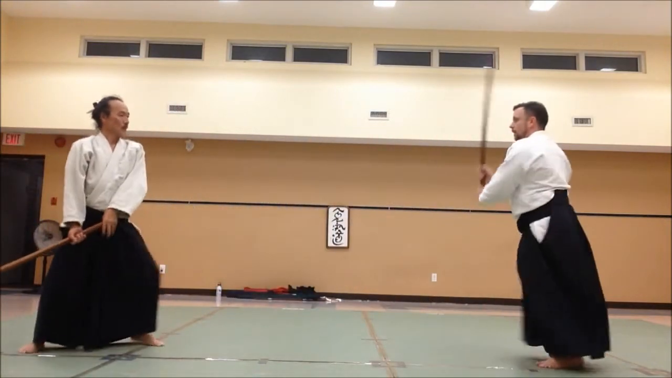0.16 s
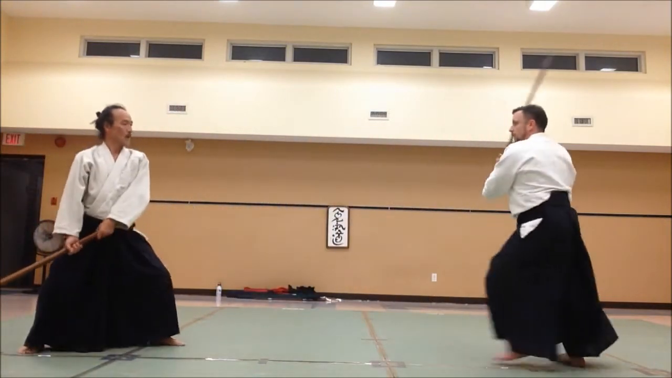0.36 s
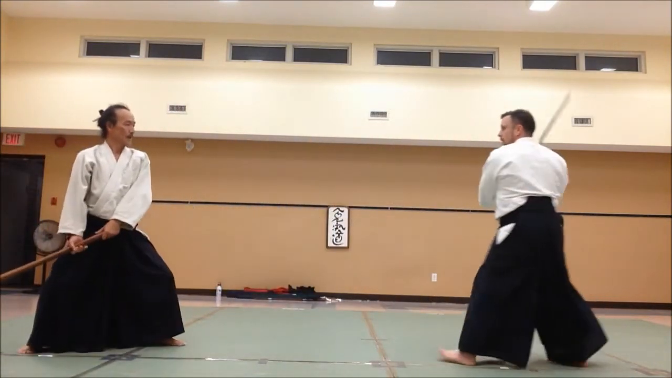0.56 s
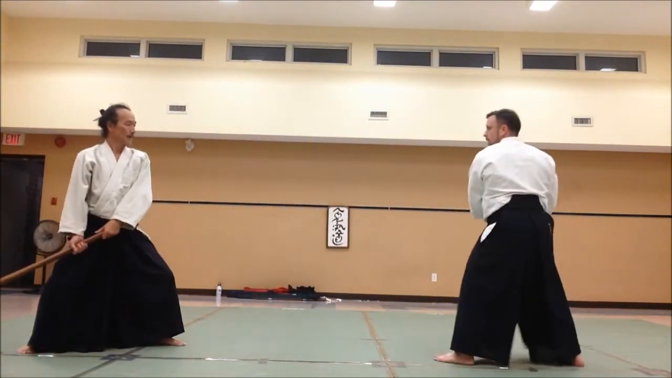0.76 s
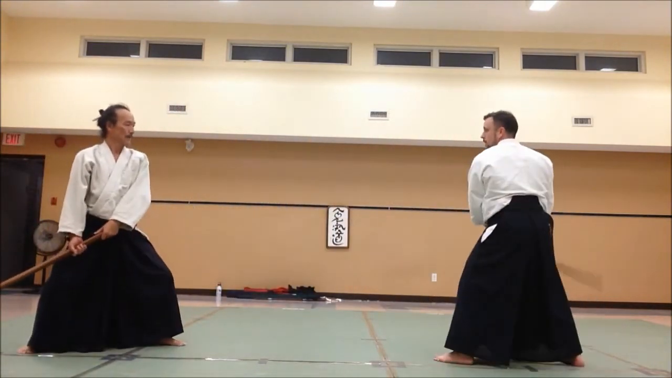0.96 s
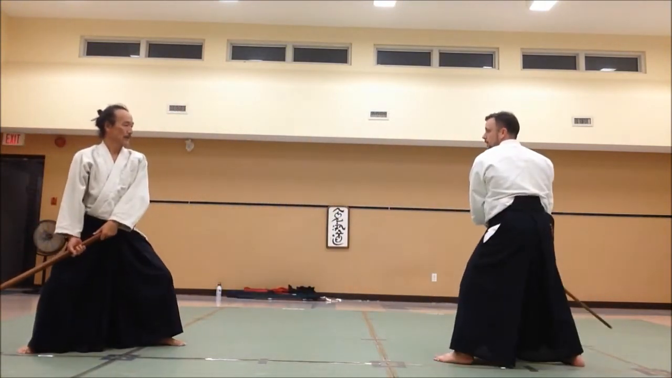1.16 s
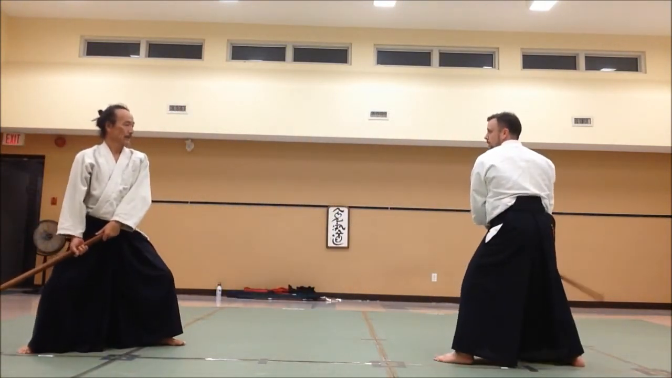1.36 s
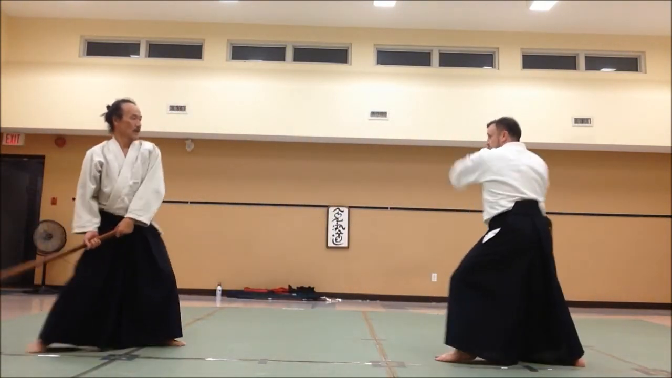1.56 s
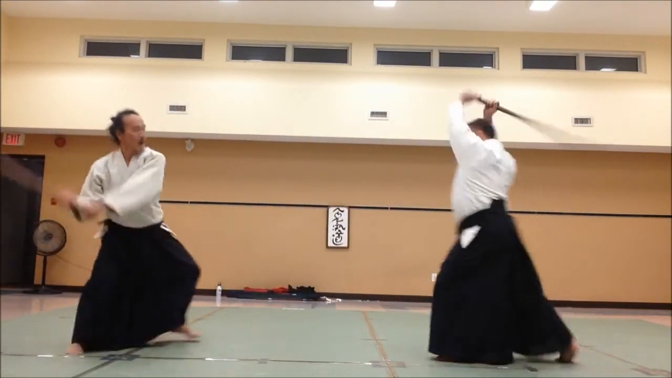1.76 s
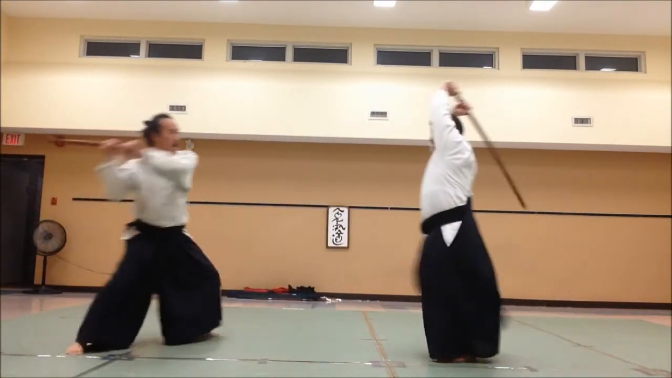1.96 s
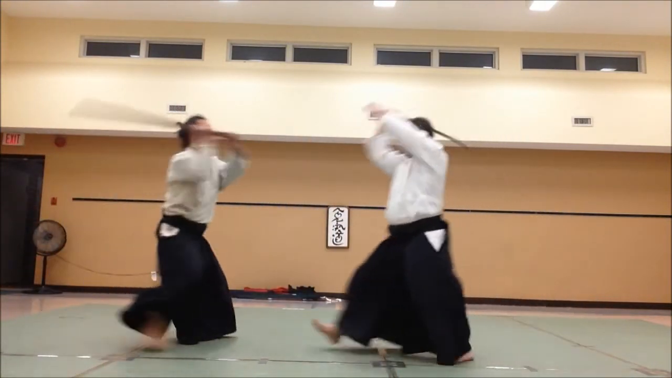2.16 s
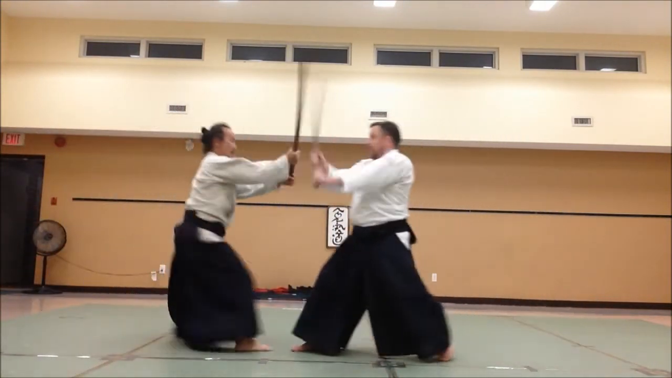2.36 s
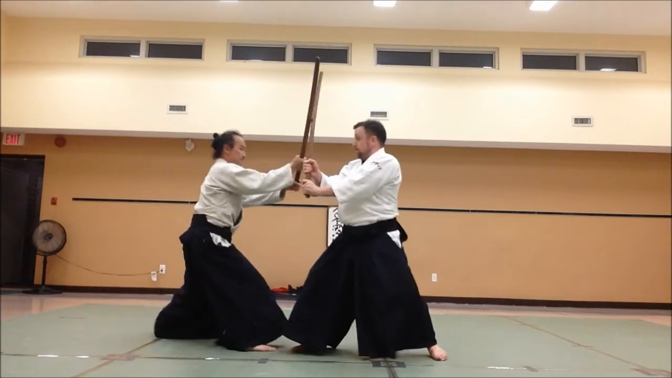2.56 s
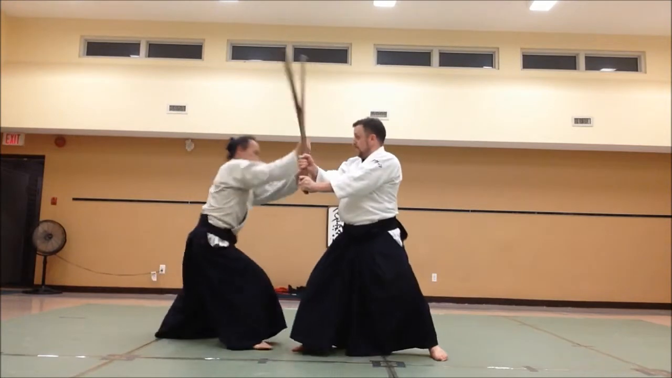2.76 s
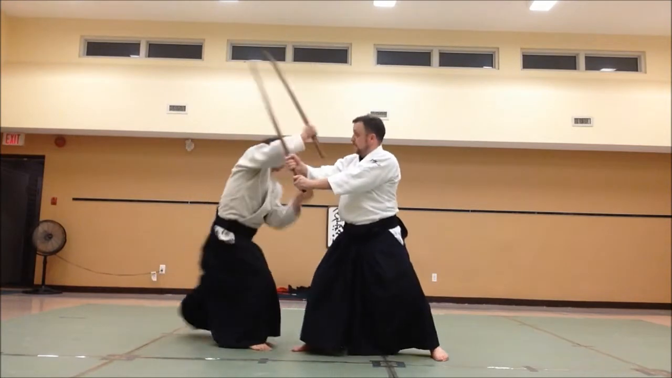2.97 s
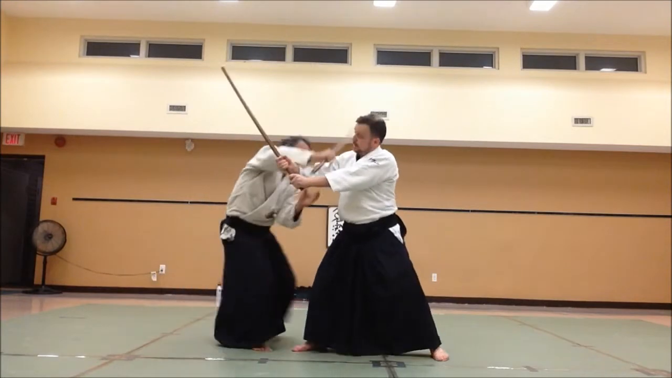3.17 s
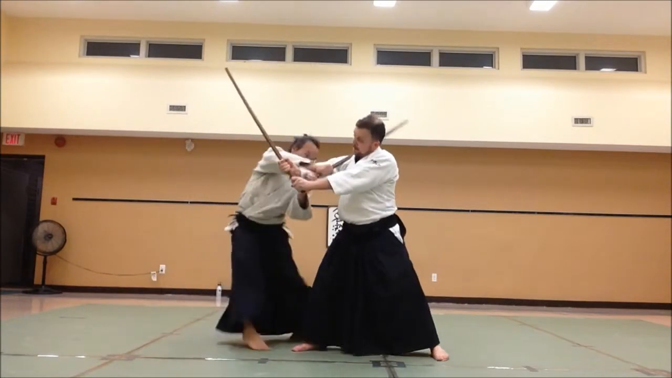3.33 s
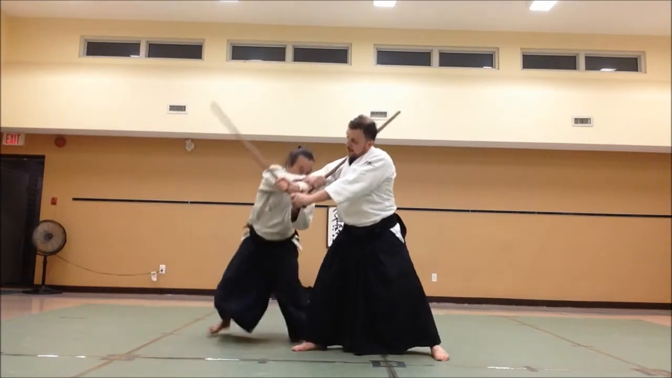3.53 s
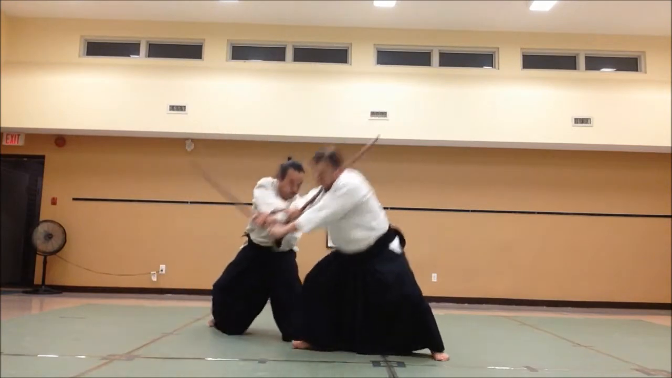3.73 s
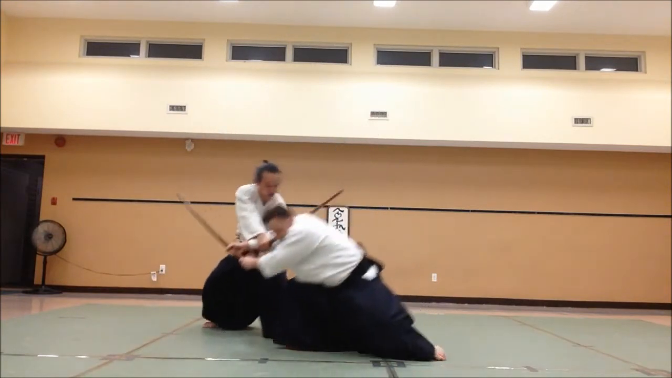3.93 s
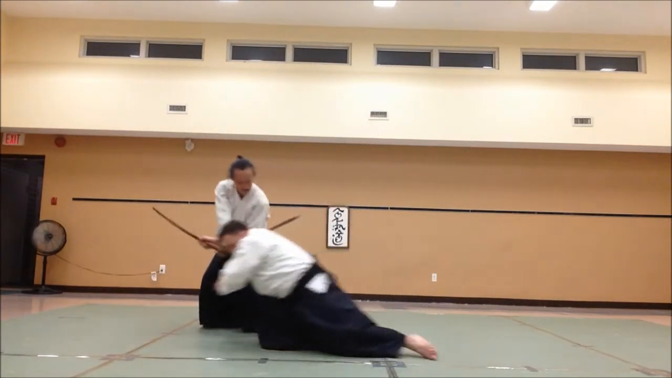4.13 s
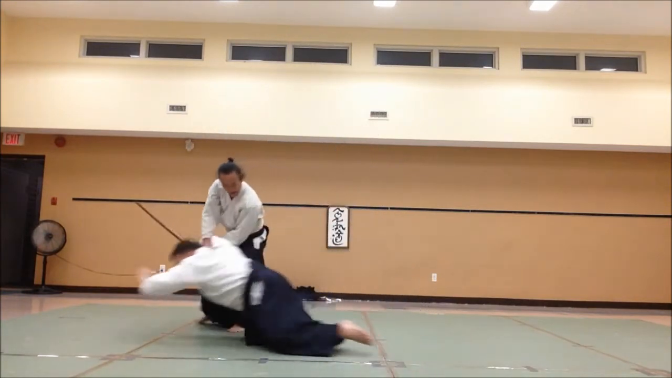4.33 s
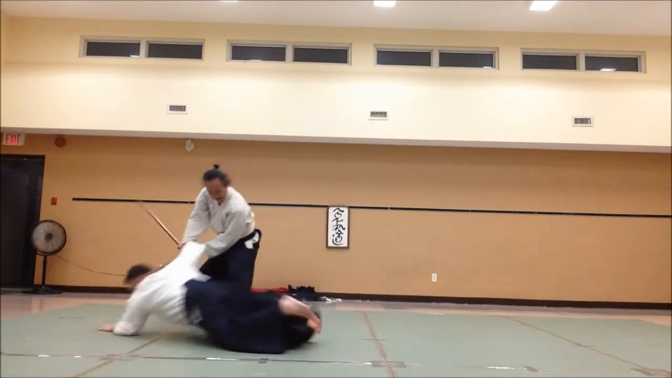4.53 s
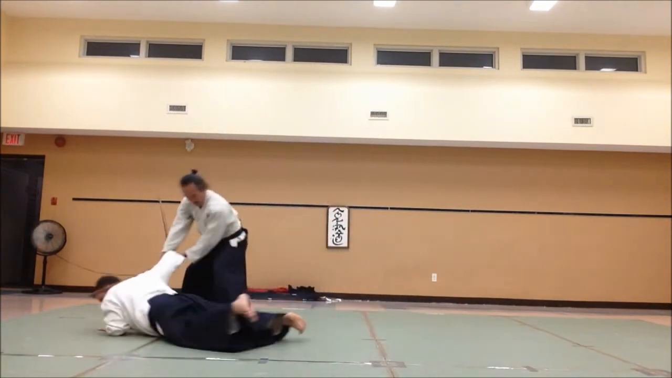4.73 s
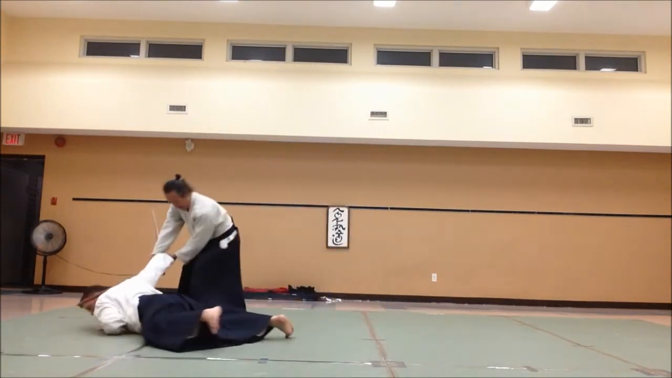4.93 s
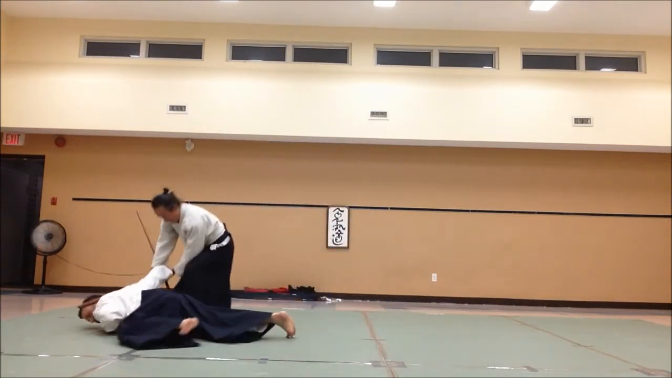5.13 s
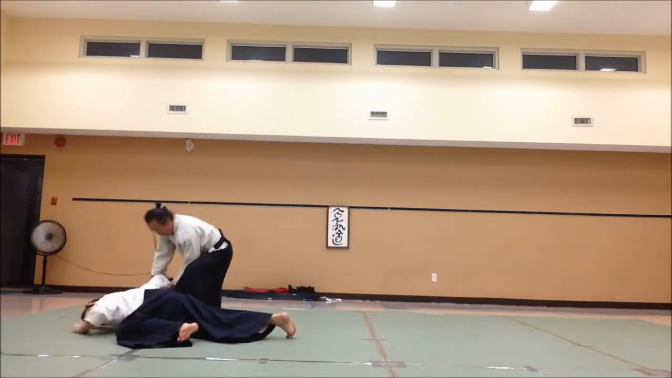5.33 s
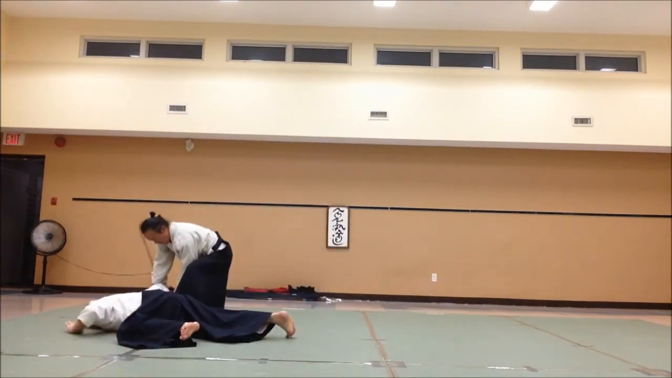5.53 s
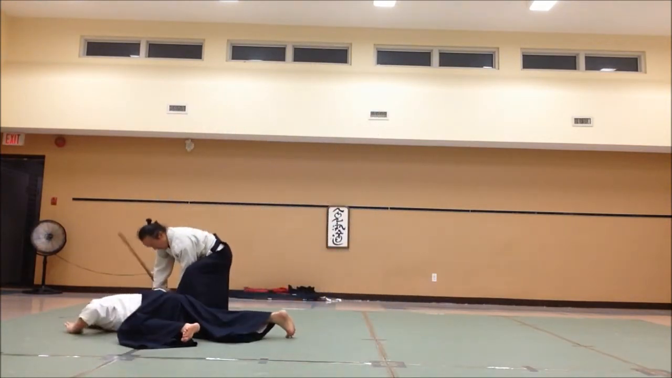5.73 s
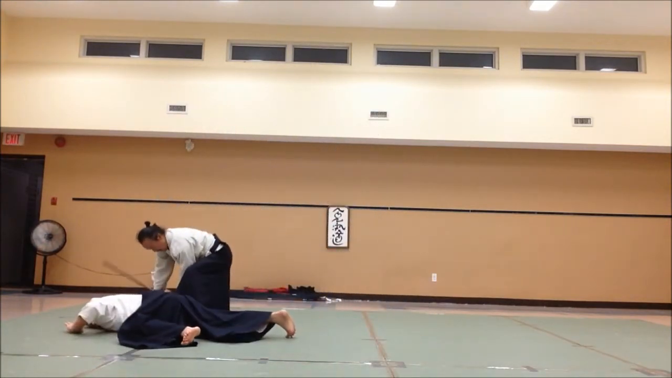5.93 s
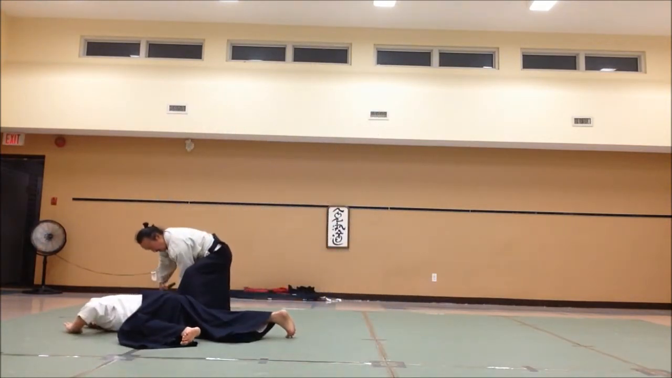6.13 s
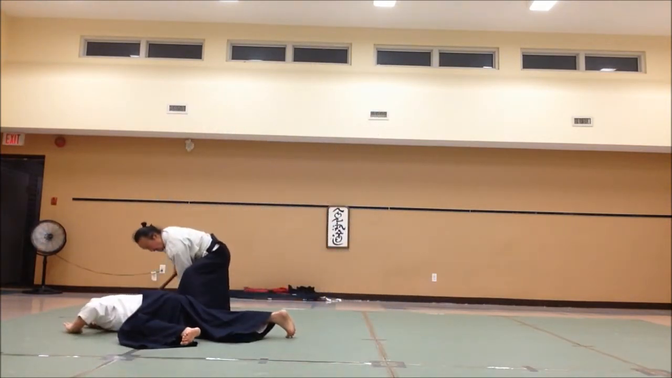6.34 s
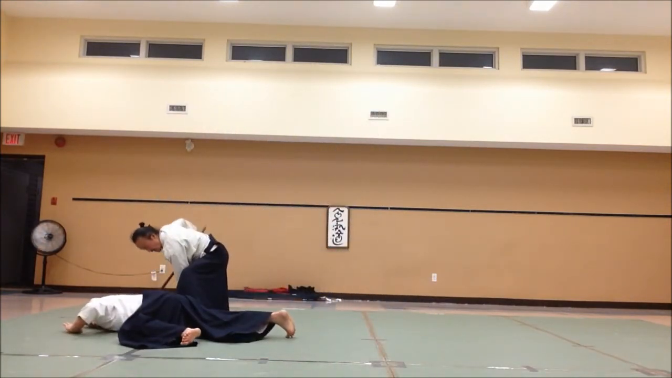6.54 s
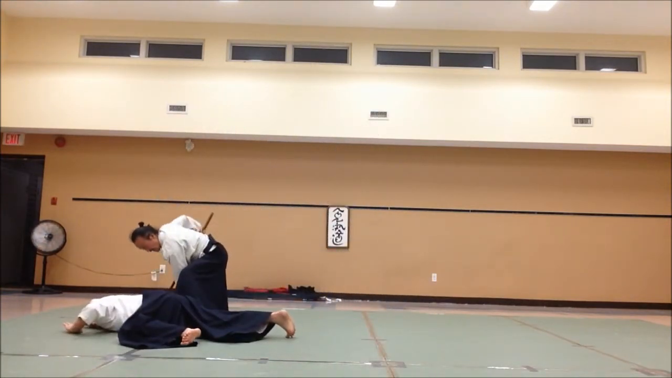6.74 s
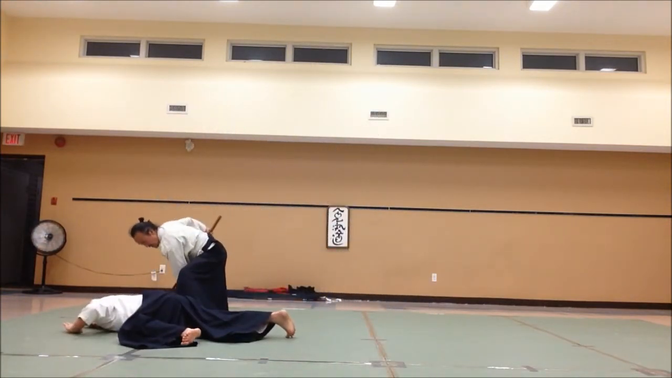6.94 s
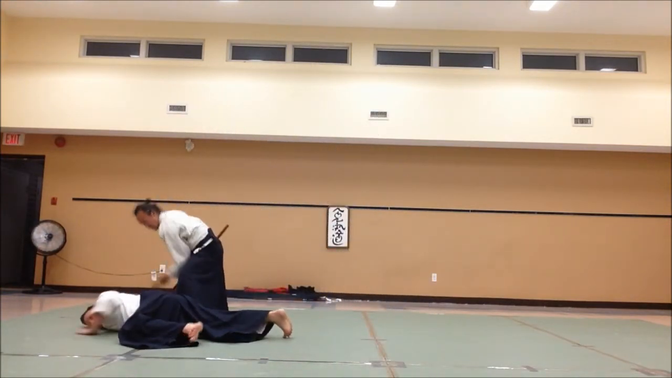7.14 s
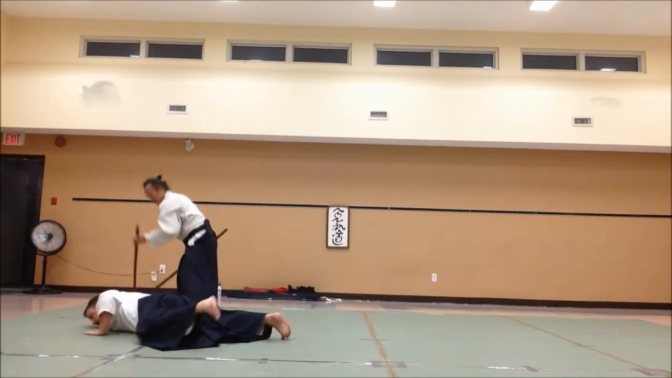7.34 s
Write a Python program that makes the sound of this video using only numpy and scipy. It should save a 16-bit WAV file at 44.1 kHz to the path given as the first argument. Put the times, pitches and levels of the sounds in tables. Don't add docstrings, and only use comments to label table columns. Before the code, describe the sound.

In a hard-walled practice hall, shuffling bare feet and stamps lead to a loud wooden sword clash, then a body slams onto a mat.

```python
import sys
import numpy as np
from scipy import signal
from scipy.fft import rfft, irfft, next_fast_len
from scipy.io import wavfile
from scipy.ndimage import uniform_filter1d, map_coordinates

SR = 44100
rng = np.random.default_rng(int(sys.argv[2]) if len(sys.argv) > 2 else 0)


def volts_from_decibels(level):
    exponent = np.asarray(level, float) / 20
    return 10 ** exponent


def to_wav(s):
    ch = np.atleast_2d(s).T
    pcm = np.round(np.clip(ch, -1, 1) * 32767)
    wavfile.write(sys.argv[1], SR, pcm.astype(np.int16))


N = 326207

# delay_s, level_db
FIRST_ECHOES = [(.0045, -16), (.013, -3), (.018, -8), (.025, -10), (.031, -10), (.036, -8), (.043, -9)]
# pitch_hz, t60_s
HALL_DECAY = [(45, 0.36), (70, .5), (100, 0.35), (180, 1.27), (500, 0.81), (1400, 1.255), (3700, 1.06),
              (7000, 0.74), (14000, 0.4)]

# pitch_hz, density_db (per Hz)
AIR_SPECTRUM = [(12, -50), (20, -23), (32, -12), (59, -7.5), (76, -3), (144, -9), (196, -8.5), (289, -15),
                (465, -7), (686, -18.5), (857, -13.5), (1230, -26), (1670, -18.5), (15500, -43)]
AIR_DB = -55.5
# pitch_hz, width_hz, level_db
HUM_MODES = [(200, 11.5, 12), (442.6, 40, 2.5)]
# loudest_s, rise_s, fall_s, level_db
HUM_SWELLS = [(6.3, .05, .2, -54), (6.42, .1, .03, -56), (6.56, .05, .2, -52), (6.85, .06, .04, -55),
              (7.05, .08, .08, -50), (7.2, .04, .3, -49), (7.32, .1, .2, -51)]

# start_s, knock_db, slap_db,
# slap_hz
TOE_TOUCHES = [(.15, -56, -59, 5000), (.1725, -50, -28.5, 4800), (.19, -41, -36, 8000),
               (0.2236, -46, -35, 1900), (.745, -57, -38, 6000), (1.515, -46, -43, 6000),
               (2.275, -48, -44, 5500), (2.305, -56, -47, 5500), (2.987, -49, -47, 8920),
               (3.705, -40, -48, 5000), (4.366, -36, -25, 1000), (5.79, -38, -60, 3000),
               (5.865, -37, -60, 3000), (5.9, -44, -60, 3000), (6.25, -36, -42, 5000),
               (6.465, -33, -53, 3970)]
# start_s, thud_db, thud_hz, knock_db, slap_db
STAMPS = [(.324, -46, 300, -42, -36), (0.3346, -49, 300, -35, -50), (.339, -47, 200, -25, -34.5),
          (.348, -42, 80, -31.5, -52), (.37, -45, 296, -33, -50), (.384, -43, 294, -37, -52),
          (1.729, -34.5, 95, -29.5, -35), (1.748, -35, 130, -31, -55), (1.8735, -34.5, 252, -31, -51),
          (2.026, -35, 172, -25, -33.5), (2.328, -30, 123, -29, -31.5), (2.388, -30, 127, -21.5, -28),
          (4.287, -35.5, 115, -34, -50), (5.09, -28, 250, -49, -39), (6.243, -39.5, 150, -31, -55),
          (7.205, -41, 250, -43, -38.5), (7.35, -41, 250, -39, -55), (7.365, -43, 250, -34, -51)]
# pitch_hz, width_hz, level_db
HEEL_MODES = [(292, 200, 0.5), (602, 184, 3.5), (1020, 390, -3.5), (1900, 940, -11.5)]
# pitch_hz, width_hz, level_db
FLOOR_MODES = [(95, 21, 3), (126, 130, -31), (180, 8.9, -10), (250, 77, 7), (548, 57, 9), (1140, 230, 17.5)]
ARM_SLAP_HZ, SOLE_SLAP_HZ = 3800, 5160
TOE_THUD_HZ, TOE_THUD_DB = 300, -15

# fastest_s, rise_s, fall_s, scrape_db,
# hiss_over_scrape_db
SLIDES = [(.36, 0.28, 0.18, -60, -5), (1.68, 0.075, 0.23, -58.5, 4), (1.77, 0.13, 0.16, -55.5, -9),
          (2.11, 0.15, 0.17, -59, -4.5), (2.968, 0.17, 0.062, -56.5, -4), (3.104, .04, 0.24, -53, 0),
          (3.25, 0.25, .4, -49.5, -7.5), (3.708, 0.26, 0.25, -59, -3), (3.948, .16, 0.27, -46.5, -6.5),
          (4.198, 0.064, 0.15, -49.5, 0.5), (4.375, 0.046, 0.12, -54.5, -0.5),
          (4.61, 0.017, 0.12, -37.5, -15), (4.97, .05, .3, -58, -7), (5.09, 0.07, 0.16, -58, -3.5),
          (5.33, .15, .1, -65.5, 0), (5.5, .3, .9, -68, -9), (6.25, 0.017, .04, -60, -14),
          (6.46, .2, .3, -67, -16), (7.04, 0.016, .4, -63, -7), (7.19, .15, .5, -67, 2),
          (7.4, 0.27, .3, -61, -3)]
# pitch_hz, density_db (per Hz)
HISS_SPECTRUM = [(3000, -31), (5000, -30), (7500, -2), (10000, -5.5), (13000, -4.5), (15300, -10),
                 (16000, -30)]
# pitch_hz, density_db (per Hz)
SCRAPE_SPECTRUM = [(1500, -22), (2500, -7.5), (3500, -4), (4300, -2), (6000, -2.5), (7800, -6), (8400, -15),
                   (12000, -22), (16000, -62)]
CREEP_DB, CREEP_HISS_DB = -69.5, -81
HISS_GROWS = 1.42
# fastest_s, rise_s, fall_s, level_db
CLOTH_SWINGS = [(.36, 0.5, .25, -54), (1.96, 0.76, 0.66, -54), (2.9, 0.42, .25, -41),
                (3.6, 0.72, 0.58, -52.5), (3.948, 0.19, 0.57, -45.5), (4.2, 0.28, 0.4, -46.5),
                (4.37, 0.11, 0.26, -47), (4.575, .004, 0.062, -27), (5.06, .12, 0.53, -49),
                (5.72, 0.81, .4, -52.5), (6.25, .04, .1, -52.5), (6.44, 0.25, 0.45, -55.5),
                (7.04, 0.022, 1.3, -52), (7.4, 0.83, .4, -53.5)]
# pitch_hz, density_db (per Hz)
CLOTH_SPECTRUM = [(120, -43), (200, -1.5), (322, 2.5), (573, -2.5), (1050, 2), (2450, -7.5), (4000, -15),
                  (5200, -15), (8800, -120)]
DRAPE_DB = -58.5

# start_s, level_db, contact_ms
CLASH = [
    (2.4221, -0.5, 0.041),
    (2.4241, -3.5, 0.052),
    (2.4266, -5.5, 0.06),
    (2.429, -10, .055),
    (2.4322, -8, 0.057),
]
# pitch_hz, width_hz, level_db
BLADE_MODES = [(1236, 213, 3), (1600, 140, 2), (2032, 173, 6), (2435, 81, 0.5), (2900, 175, 4.5),
               (3250, 46, 4), (3830, 640, -0.5), (4230, 33, -11), (4930, 1300, -6), (6800, 1200, -48),
               (9600, 3500, -40)]
GRIND_DB, GRIND_T60_S = -5.5, 0.03
# start_s, level_db
BIND = [
    (2.43, -25),
    (2.469, -19),
    (2.52, -23.5),
]
# pitch_hz, width_hz, level_db
SHAFT_MODES = [(294, 18.6, -6), (549, 22.6, 2.5), (785, 30, -12)]

# time_s, pitch_hz, level_db
SKID = [(4.282, 178.4, -52), (4.299, 252.3, -28), (4.34, 479.3, -31), (4.37, 679.4, -24),
        (4.391, 647, -24.5), (4.405, 732, -36.5), (4.44, 872, -37), (4.49, 920, -43)]
# start_s, thud_db, thud_hz, knock_db, slap_db
FALL = [
    (4.547, -29, 230, -58, -60),
    (4.5553, -23, 390, -19, -32),
    (4.5572, -4, 219.6, -8.5, -6),
]


def unit(x):
    return x / np.sqrt(np.mean(x ** 2) + 1e-20)


def peak(x):
    return x / np.abs(x).max()


def along(points, hz):
    f, v = np.transpose(points)
    return np.interp(np.log(hz + 1), np.log(f + 1), v)


def filtered(x, response):
    m = next_fast_len(len(x) + 8192)
    return irfft(rfft(x, m) * response(np.fft.rfftfreq(m, 1 / SR)), m)[:len(x)]


def resonant(x, modes):
    def response(hz):
        total = 0
        for k, (centre, width, db) in enumerate(modes):
            damping = 1j * hz * width
            total = total + (-1) ** k * volts_from_decibels(db) * damping / (centre ** 2 - hz ** 2 + damping)
        return total
    return filtered(x, response)


def wobble(rate):
    knots = rng.standard_normal(int(N * rate / SR) + 4)
    return map_coordinates(knots, [np.arange(N) * rate / SR])


def rush(spectrum, grain_db, patchy_db=0):
    z = signal.stft(rng.standard_normal(N), nperseg=512)[2]
    field = uniform_filter1d(rng.standard_normal(z.shape), size=3, axis=0)
    field = uniform_filter1d(field, size=20, axis=1)
    patched = signal.istft(z * volts_from_decibels(patchy_db * unit(field)), nperseg=512)[1][:N]
    grainy = patched * volts_from_decibels(grain_db * wobble(300))
    return unit(filtered(grainy, lambda hz: volts_from_decibels(along(spectrum, hz))))


def swells(rows, rest_db, grows=1, extra_db=0):
    s, rise, fall, db = np.transpose(rows)[:4, :, None]
    t = np.arange(0, N + 64, 64) / SR
    shape_db = -10 * np.maximum((s - t) / np.abs(rise), (t - s) / np.abs(fall))
    power = volts_from_decibels(rest_db) ** 2 + np.sum(volts_from_decibels(db + extra_db + grows * shape_db) ** 2, axis=0)
    return np.interp(np.arange(N) / SR, t, np.sqrt(power))


def hall(walls_db, tail_db):
    answer = np.zeros(SR // 10)
    if tail_db is not None:
        hz, t, z = signal.stft(rng.standard_normal(5 * SR // 4), SR, nperseg=256)
        decay = volts_from_decibels(-60 * t / along(HALL_DECAY, hz)[:, None])
        tail = signal.istft(z * decay, SR, nperseg=256)[1]
        tail = tail * np.clip((np.arange(len(tail)) / SR - .009) / 0.0053, 0, 1)
        answer = volts_from_decibels(tail_db) * tail / np.linalg.norm(tail)
    answer[0] = 1
    for s, db in FIRST_ECHOES:
        answer[round(s * SR)] += volts_from_decibels(db + walls_db)
    return answer


def add(track, s, sound, walls_db, tail_db):
    heard = signal.fftconvolve(sound, hall(walls_db, tail_db))
    start = round(s * SR)
    track[start:start + len(heard)] += heard[:N - start]


def room_tone():
    hum = np.zeros(N)
    for hz, width, db in HUM_MODES:
        phase = 2 * np.pi * np.cumsum(hz + .55 * width * wobble(30)) / SR
        hum += volts_from_decibels(db + 2.6 * wobble(20)) * np.sin(phase)
    air = volts_from_decibels(AIR_DB + 0.1 * wobble(2.8)) * rush(AIR_SPECTRUM, grain_db=1.0)
    return air + swells(HUM_SWELLS, rest_db=-94) * unit(hum)


def shuffle():
    hiss_over_scrape_db = np.array(SLIDES)[:, -1:]
    hiss_gain = swells(SLIDES, CREEP_HISS_DB, HISS_GROWS, hiss_over_scrape_db)
    hiss = hiss_gain * rush(HISS_SPECTRUM, grain_db=1.0, patchy_db=1.5)
    scrape_gain = volts_from_decibels(2.0) * swells(SLIDES, CREEP_DB)
    scrape = scrape_gain * rush(SCRAPE_SPECTRUM, grain_db=1.0, patchy_db=1.8)
    cloth_gain = volts_from_decibels(1.0) * swells(CLOTH_SWINGS, DRAPE_DB)
    cloth = cloth_gain * rush(CLOTH_SPECTRUM, grain_db=1.5, patchy_db=1.5)
    return hiss + scrape + cloth


def thuds(rows, board_db, crackle_db, top_db, walls_db, tail_db):
    out, t = np.zeros(N), np.arange(SR // 4) / SR
    tap = 1. * (t == 0)
    knock = peak(resonant(t * np.exp(-t / .00012), HEEL_MODES))
    for s, db, thud_hz, knock_db, slap_db, slap_hz in rows:
        u = 2 * np.pi * thud_hz * t
        push = np.sin(u) * u * np.exp(-u / 2.6)
        push = peak(push + volts_from_decibels(board_db) * resonant(push, FLOOR_MODES))
        skin = [(slap_hz, 0.84 * slap_hz, 0), (2.14 * slap_hz, 3.4 * slap_hz, top_db)]
        slap = peak(resonant(tap, skin))
        contact = volts_from_decibels(db) * push + volts_from_decibels(knock_db) * knock + volts_from_decibels(slap_db) * slap
        add(out, s, contact, walls_db, tail_db)
        patter = volts_from_decibels(-60 * t / 0.017) * rng.standard_normal(len(t))
        crackle = peak(resonant(patter, skin))
        add(out, s, volts_from_decibels(slap_db + crackle_db) * crackle, walls_db, None)
    return out


def toes():
    touches = [(s, db + TOE_THUD_DB, TOE_THUD_HZ, db, *slap) for s, db, *slap in TOE_TOUCHES]
    return thuds(touches, board_db=-5, crackle_db=-4, top_db=-18, walls_db=-6, tail_db=-4)


def stamps():
    rows = [(*row, SOLE_SLAP_HZ) for row in STAMPS]
    return thuds(rows, board_db=-5, crackle_db=-2, top_db=-13, walls_db=-2, tail_db=-2)


def swords():
    out, t = np.zeros(N), np.arange(SR // 4) / SR
    for k, (s, db, ms) in enumerate(CLASH):
        ring = peak(resonant(t * np.exp(-1000 * t / ms), BLADE_MODES))
        add(out, s, volts_from_decibels(db) * ring, walls_db=-5.5, tail_db=None if k else 9)
    grit = uniform_filter1d(rng.standard_normal(len(t)), size=5)
    grind = resonant(volts_from_decibels(-60 * t / GRIND_T60_S) * grit, BLADE_MODES)
    add(out, CLASH[0][0], volts_from_decibels(GRIND_DB) * peak(grind), walls_db=-6, tail_db=None)
    for s, db in BIND:
        knock = resonant(t / .0004 * np.exp(-t / 0.00099), SHAFT_MODES)
        add(out, s, volts_from_decibels(db) * peak(knock), walls_db=7.5, tail_db=2.5)
    return out


def skid():
    s, hz, db = np.transpose(SKID)
    t = np.arange(N) / SR
    slip = np.cumsum(65 * (1 + 0.18 * wobble(40)) / SR) % 1
    pitch_hz = np.interp(t, s, hz) * (1 + 0.121 * wobble(150))
    tone = np.sin(2 * np.pi * np.cumsum(pitch_hz) / SR)
    level = volts_from_decibels(np.interp(t, s, db, left=-200, right=-200))
    grit = 0.93 + .3 * wobble(500)
    close = level * np.exp(-2.5 * slip) * tone * grit
    return signal.fftconvolve(close, hall(walls_db=-7.0, tail_db=-4.0))[:N]


def body_fall():
    rows = [(*row, ARM_SLAP_HZ) for row in FALL]
    return thuds(rows, board_db=-1.5, crackle_db=-7.0, top_db=-10.5, walls_db=-2.5, tail_db=3.5)


def scene():
    return (room_tone() + shuffle() + toes() + stamps() + swords() + skid() + body_fall())[None]


def low_pass(x):
    return signal.sosfilt(signal.butter(12, 16420, fs=SR, output="sos"), x)


def record(dry):
    def microphone(hz):
        bass_cut = (1j * hz / (32 + 1j * hz)) ** 3
        return bass_cut / (1 + (hz / 15450) ** 80)
    heard = filtered(dry[0], microphone)[None]
    held = heard / (1 + np.abs(heard / 1.05) ** 6) ** (1 / 6)
    return low_pass(held)


dry = scene()
out = record(dry)
to_wav(out)
```